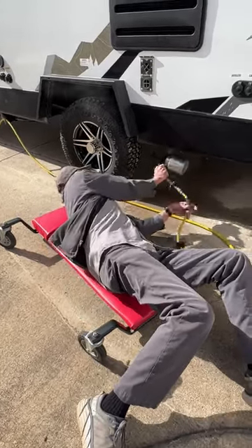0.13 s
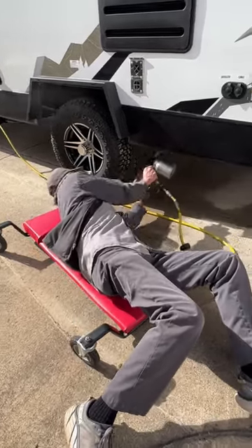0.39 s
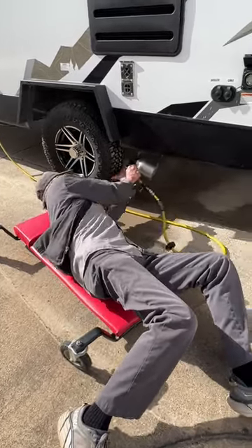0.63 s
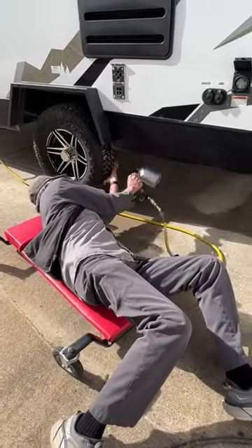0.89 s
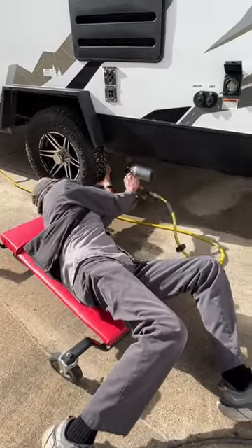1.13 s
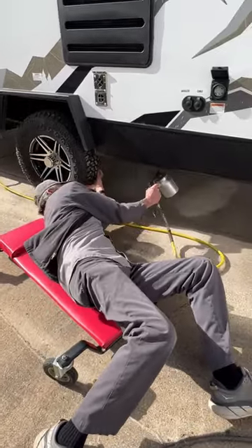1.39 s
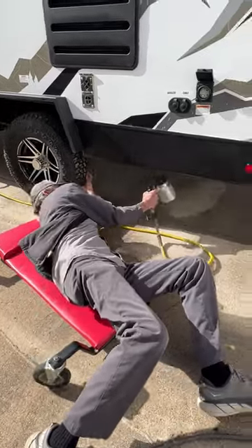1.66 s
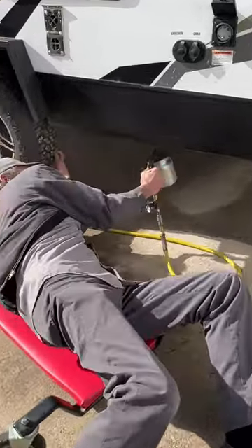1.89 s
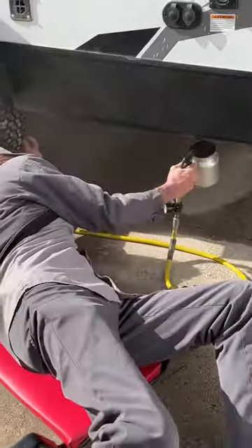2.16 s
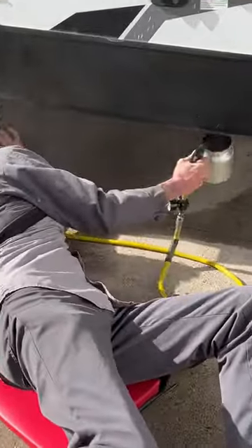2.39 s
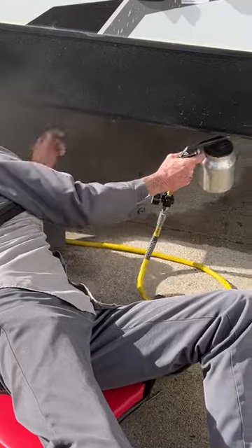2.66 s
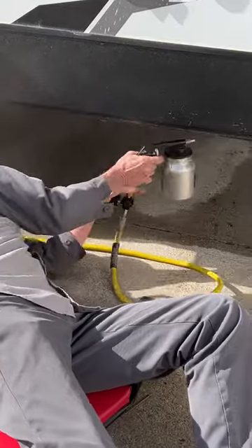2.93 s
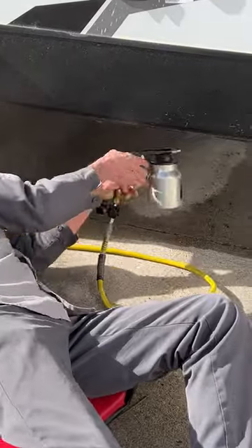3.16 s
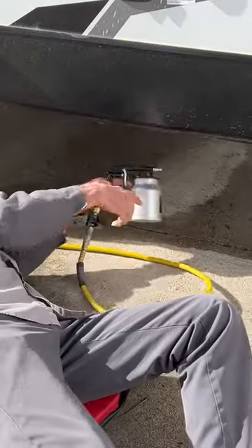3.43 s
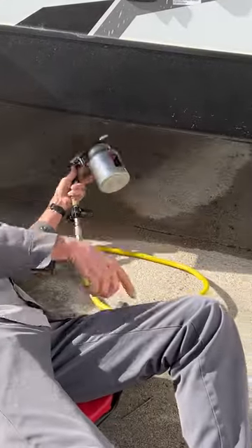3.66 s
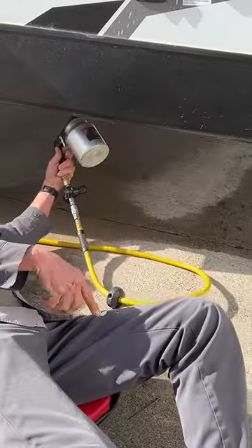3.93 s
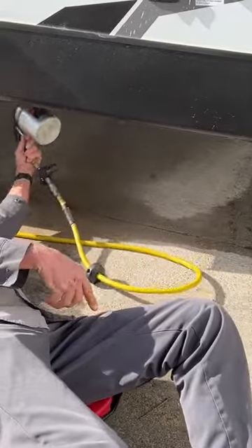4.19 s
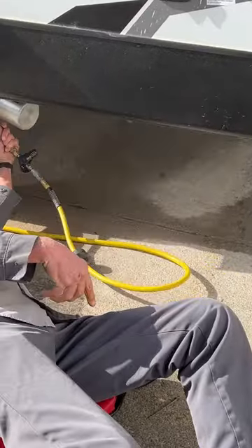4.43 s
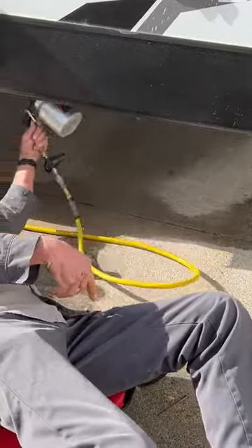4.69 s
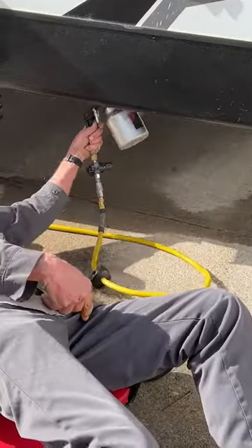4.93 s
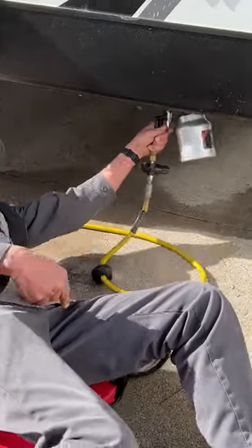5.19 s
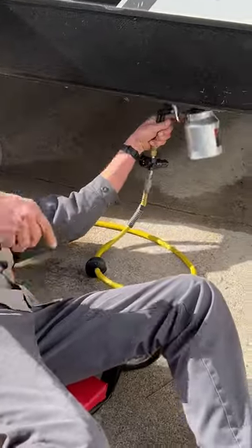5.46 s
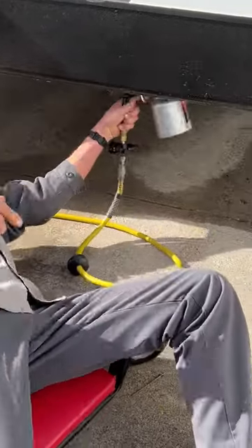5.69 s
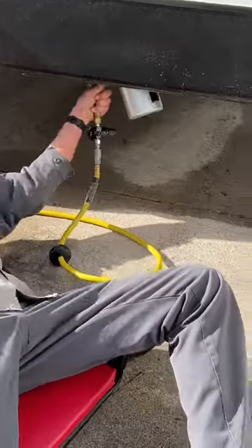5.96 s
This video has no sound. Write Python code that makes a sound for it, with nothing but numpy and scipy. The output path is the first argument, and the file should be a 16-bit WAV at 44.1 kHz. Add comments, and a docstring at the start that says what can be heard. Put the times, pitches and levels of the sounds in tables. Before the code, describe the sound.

Compressed-air spray gun hisses in three sustained bursts under a parked trailer, with buffeting wind thuds, pops and faint cloth scuffs outdoors.

```python
"""Under a trailer on concrete, a compressed-air spray gun hisses in three bursts near a hand-held phone.
The jet is shaped noise behind a valve, combed by echoes off ground and chassis, with a diffuse tail from the gap.
Wind thuds and flutters as swelling noise and pops as short falling tones; grainy noise makes cloth scuffs.
A faint whistle sounds in the second pause, over a distant outdoor hush.
When the camera zooms in, the phone narrows its wide stereo picture to a forward beam."""
import sys
import numpy as np
from scipy import signal
from scipy.fft import rfft, irfft, next_fast_len
from scipy.io import wavfile
from scipy.ndimage import uniform_filter1d, map_coordinates

SR = 44100
rng = np.random.default_rng(int(sys.argv[2]) if len(sys.argv) > 2 else 0)


def transcribe(signal):
    """Save signal, clipped to [-1, 1], as a 16-bit WAV file at the path in sys.argv[1]."""
    frames = np.atleast_2d(signal).T
    limited = np.clip(frames, -1, 1)
    pcm = np.round(limited * 32767).astype(np.int16)
    wavfile.write(sys.argv[1], SR, pcm)


def boost(x):
    """Linear amplitude factor 10**(x/20) for a level x in decibels (scalar or array-like)."""
    u = np.asarray(x, float) / 20
    return 10 ** u


N = 268128
T = np.arange(N) / SR
PADDED = next_fast_len(N + SR // 4)
HZ = np.fft.rfftfreq(PADDED, 1 / SR)
ZOOM_S = (1.81, 2.093)  # start and end of the zoom

# Trigger pulls. Each row: pressed in seconds, let go in seconds, fall after letting go in dB per second,
# level of the air draining from the nozzle in dB. The top of the hiss scales the last two by its own factor.
TRIGGER_PULLS = [(-.1, 0.773, 304, -26), (1.002, 2.612, 480.5, -33.5), (3.778, 5.429, 385, -31.5)]
# The hand swings the gun about. Each row: time in seconds, jet level in dB, lift of the top of the hiss in dB.
GUN_AIM = [(0, -17.5, 3), (.27, -20, 6), (.77, -21, 5), (1.03, -20.5, 5.5), (1.5, -22.5, 4.5),
           (1.62, -20, 4.5), (1.85, -21, 3.5), (2.3, -22, 4), (2.61, -19.5, 2), (3.8, -18, 3),
           (4.3, -18, 3), (4.35, -19.5, 4), (4.9, -22, 5.5), (5.43, -21, 5)]
# Colour of the jet. Each row: frequency in Hz, relative density in dB per Hz.
JET_COLOUR = [(300, -17), (650, -11), (1100, -8.5), (2100, -2), (3200, -1.5), (4500, -2.5), (6500, -0.5),
              (8500, 0.5), (10500, -3), (13000, -6.5), (16000, -6.5)]
# Chassis pockets the jet rings in. Each row: centre in Hz, width in Hz, lift in dB.
CHASSIS_POCKETS = [(1570, 74, 2.5), (2110, 130, 2.5), (2944, 200, 3.5), (3320, 90, 3.5), (4200, 500, 0.5),
                   (5750, 170, 1.5), (8250, 270, -0.5)]
# A deep pocket booms while the gun points into it. Each row: time in seconds, lift in dB.
BOOM_LIFT = [(.3, 2.5), (1.4, 9), (2.3, 10), (4.05, -1.5), (4.3, 10), (4.5, 15), (5.2, 3.5)]
# Echo off the concrete. Each row: time in seconds, extra path in milliseconds.
GROUND_PATH = [(0, 1.66), (.8, 2), (1.4, 1.69), (2.3, 1.61), (4, 1.465), (5.4, 1.56)]
# Echoes off parts of the chassis. Each row: central delay in milliseconds, level in dB.
CHASSIS_ECHOES = [(3.1, -11), (4.7, -10), (7.3, -13), (11.9, -10)]
# Decay under the trailer. Each row: band centre in Hz, time to fall 60 dB in seconds.
HOLLOW_DECAY = [(500, 1), (2000, 0.95), (6000, 0.69), (12000, .4)]
# Slowly changing breeze on the microphones, under the gusts.
# Each row: time in seconds, thud level in dB, flutter level in dB.
BREEZE = [(0, -31, -43), (.9, -43, -49), (1.5, -34.5, -39), (2.2, -40.5, -41), (2.95, -37, -53),
          (3.1, -68, -52.5), (3.7, -80, -56.5), (4.3, -76, -52), (4.6, -55.5, -43), (5.4, -53.5, -43),
          (5.62, -71, -50), (6.08, -86, -59)]
# Gusts. Each row: peak time in seconds, thud level in dB, flutter level in dB,
# time constant of the rise in seconds.
WIND_GUSTS = [(.13, -24, -35.5, 0.033), (.27, -25.5, -43.5, 0.018), (.34, -25, -38.5, 0.039),
              (.74, -38.5, -59.5, 0.052), (.81, -32, -40.5, 0.02), (1.22, -24.5, -32.5, 0.049),
              (1.37, -26, -37.5, 0.036), (1.5, -31, -29.5, 0.063), (1.6, -30, -30, 0.045),
              (1.68, -19, -31.5, 0.044), (1.75, -36, -33, 0.034), (1.86, -23, -46.5, 0.043),
              (2.02, -32, -26, .02), (2.1, -21.5, -42.5, 0.019), (2.36, -21.5, -44, 0.017),
              (2.55, -20, -36, 0.011), (2.59, -19, -43.5, 0.016), (2.62, -47, -30, 0.008),
              (2.66, -29.5, -44, 0.0068), (2.72, -16, -39.5, 0.024), (2.78, -20, -39, 0.022),
              (2.85, -12.5, -38.5, 0.037), (2.92, -14, -41, 0.023), (2.99, -40.5, -39, .02),
              (3.28, -42.5, -39.5, 0.047), (3.47, -63, -33.5, 0.011), (3.71, -57, -35, 0.017),
              (3.94, -34, -31, 0.037), (4.475, -61, -18, 0.053), (4.67, -29, -43.5, 0.028),
              (4.81, -42.5, -30, 0.056), (5.03, -47, -32.5, 0.079), (5.27, -44, -43, 0.046),
              (5.54, -40.5, -43, 0.017)]
# Wind pops. Each row: start in seconds, peak of the envelope in dB, nominal pitch in Hz,
# cycles to the peak (never under 0.3).
WIND_POPS = [(0.797, -24, 250, 0.98), (1.918, -18.5, 570, 1), (2.674, -15.5, 254, 0.93),
             (2.697, -14.5, 372, 1), (2.798, -21.5, 295, 0.52), (2.831, -13.5, 223, 0.45),
             (2.878, -15.5, 210.4, 0.94), (2.957, -18, 464, 1), (3.066, -27.5, 239, 0.8),
             (3.174, -33, 328, 0.98), (3.239, -22, 613, 0.84), (3.27, -21, 413, 0.61),
             (3.301, -24, 418, 0.8), (3.32, -25.5, 509, 0.94), (3.366, -22, 486, 1), (3.449, -31, 501, 0.8),
             (3.464, -18, 524, 1), (3.506, -19.5, 338, 0.45), (3.553, -32.5, 283, 1), (3.61, -23, 470, 1),
             (3.646, -36.5, 585, 1), (3.704, -19.5, 513, 1), (3.744, -19, 638, 0.95),
             (3.759, -23.5, 665, 0.75), (5.533, -14, 477, 0.7), (5.547, -24.5, 503, 0.89)]
# Cloth and hose scuffs. Each row: centre in seconds, level in dB, half length in seconds.
SCUFF_TIMES = [(3.405, -56.5, 0.018), (3.673, -60, 0.0084), (5.654, -48.5, .016), (5.684, -46, .022),
               (5.716, -57, .02), (5.773, -59.5, 0.036), (5.817, -53, .01), (5.85, -54, 0.0099),
               (5.883, -53.5, 0.021), (5.93, -55, 0.016)]
# Colour of the scuffs. Each row: frequency in Hz, relative density in dB per Hz.
SCUFF_COLOUR = [(300, -16), (700, 3.5), (1300, 0), (1800, -3), (2400, -10.5), (4500, -16.5), (9000, -21),
                (16000, -30)]
# Corners of the whistle's swell, in seconds: silent, full, starting to fade, silent again.
WHISTLE_S = (3.3, 3.46, 3.58, 3.68)
# Bands of the whistle. Each row: centre in Hz, half width in Hz, level in dB.
WHISTLE_BANDS = [(2450, 170, -74), (4620, 150, -82)]
# Colour of the outdoor hush. Each row: frequency in Hz, relative density in dB per Hz.
YARD_COLOUR = [(150, -20.5), (300, -1.5), (550, -11.5), (1500, -10), (3000, -20.5), (6000, -31),
               (9500, -32.5), (12000, -32), (16000, -41.5)]
# Sliding corner below which the bass thins out. Each row: time in seconds, octaves above 25 Hz.
BASS_CORNER = [(0, 3.42), (.7, 2.07), (1.2, 2.8), (1.6, 2.44), (1.9, 1.15), (2.2, 0.35), (2.95, 0.91),
               (3.05, 2.43), (3.7, 4.14), (4, 3.85), (4.45, 4.14), (4.7, 2.9), (5.5, 2.03), (5.65, 3.14),
               (6.08, 3.46)]
# Colour of each side port of the phone. Each row: frequency in Hz, left gain in dB, right gain in dB.
PORT_COLOUR = [(110, -1, -1.5), (250, -4, 0.5), (650, 0.5, -3.5), (1000, 1.5, -0.5), (2420, -1.5, 3),
               (3800, 2, -4), (5500, 2, -1), (6140, 3.5, -2), (7320, 1.5, 2), (7850, -5, -9),
               (7990, 2.5, 8.5), (9240, -1.5, 3.5), (9710, -6, -1)]
# Phase by which left leads right in the beam. Each row: frequency in Hz, lead in radians.
BEAM_LEADS = [(0, 0), (2500, 0), (3400, .5), (4500, .4), (5300, 0), (5860, -.6), (6500, -.05), (7250, 0),
              (8000, -.8), (8600, -1.2), (9300, -2.6), (10000, -3.14), (10700, -3.6), (12400, -5.6),
              (13400, -6.28), (14100, -6.6), (15900, -8.6), (17000, -10)]
# The same for the top of the wide picture. Each row: frequency in Hz, lead in radians.
WIDE_TOP_LEADS = [(9500, -1.8), (10400, -2.9), (11000, -3.4), (12400, -5.4), (13400, -6.28), (14100, -6.6),
                  (15900, -8.6), (17000, -10)]


def level(x, db):
    """Scale to an rms level in dB."""
    return x * boost(db) / np.sqrt(np.mean(x ** 2))


def along(hz, values):
    """Read a spectrum on a log-frequency axis."""
    return np.interp(np.log(HZ + 1), np.log(hz), values)


def colour(x, gain):
    """Filter by a gain per frequency."""
    return irfft(rfft(x, PADDED) * gain, PADDED)[..., :N]


def band(lo_hz, hi_hz, order=2):
    """Band-pass gain; a higher order makes steeper skirts."""
    low_skirt = 1 + (lo_hz / (HZ + 1)) ** (2 * order)
    high_skirt = 1 + (HZ / hi_hz) ** (2 * order)
    return 1 / np.sqrt(low_skirt * high_skirt)


def peak(hz, width_hz):
    """Resonance curve that reaches 1 at its centre and a half at the edges of its width."""
    return 1 / (1 + ((HZ - hz) / width_hz * 2) ** 2)


def walk(rate):
    """Random levels held 1 / rate seconds and slewed twice."""
    hold = int(SR / rate)
    steps = np.repeat(rng.standard_normal(N // hold + 1), hold)
    return uniform_filter1d(uniform_filter1d(steps, hold), hold)[:N]


def pair(alike):
    """Left and right noise with a given likeness 0-1, which may depend on frequency."""
    alike = np.clip(alike, 0, 1)
    mid, side = rng.standard_normal((2, N))
    return colour(mid, np.sqrt(1 + alike)) + colour(side, np.sqrt(1 - alike)) * np.array([[1], [-1]])


def echo(x, lag_s):
    """A copy read at a moving delay."""
    place = np.arange(N) - lag_s * SR
    return np.array([map_coordinates(c, place[None], order=3, prefilter=False) for c in x])


def spray():
    """Turbulent jet, coloured by the chassis pockets it rings in and combed by near reflections."""
    s, *aim_db = np.transpose(GUN_AIM)
    jet_db, top_lift_db = (np.interp(T, s, db) for db in aim_db)
    air = pair(0.29 + 0.31 / (1 + HZ / 150.0))
    air = level(colour(air, boost(along(*np.transpose(JET_COLOUR)))), 0)
    air = air * boost(0.92 * walk(60) + 1.0 * walk(400))  # slow and fast turbulence

    jet = colour(air, boost(sum(db * peak(hz, width) for hz, width, db in CHASSIS_POCKETS)))
    boom_gain = boost(np.interp(T, *np.transpose(BOOM_LIFT)))
    jet = jet + colour(jet, peak(643, 200)) * (boom_gain - 1)

    ground_lag_s = np.interp(T, *np.transpose(GROUND_PATH)) / 1000
    jet = jet + boost(-13) * echo(jet, ground_lag_s)
    # axles, springs and frame rails each send a copy whose path wanders with the hand
    jet = jet + sum(boost(db) * echo(jet, (ms + .3 * walk(2.578)) / 1000) for ms, db in CHASSIS_ECHOES)

    # the thin top of the hiss opens first and dies faster
    top = band(11000.0, 30000., order=8)
    body_part = colour(jet, 1 - top) * valve(open_s=.012, fall=1)
    top_part = colour(jet, top) * boost(top_lift_db) * valve(open_s=.003, fall=1.4)
    return (body_part + top_part) * boost(jet_db)


def valve(open_s, fall):
    """Air flow 0-1: opens quickly at each pull, dies away after it, a little drains on."""
    drain_s = .1  # time constant of the draining air at a fall of 1
    flow = 0
    for on, off, db_per_s, drain_db in TRIGGER_PULLS:
        after = np.maximum(T - off, 0)
        drain = boost(fall * drain_db) * np.exp(-fall * after / drain_s)
        shut = boost(-fall * db_per_s * after) + drain
        flow = flow + (1 - np.exp(-np.maximum(T - on, 0) / open_s)) * shut
    return flow


def hollow(x):
    """Diffuse tail of the gap between floor pan and concrete; the treble dies first."""
    t = T[:SR]
    tail = 0
    for hz, t60 in HOLLOW_DECAY:
        grain = colour(rng.standard_normal((2, N)), band(hz / 0.57, hz * 1.9))[:, :SR]
        tail = tail + grain * np.exp(-np.log(1000) * t / t60)
    tail = tail * boost(-26) / np.sqrt(np.sum(tail ** 2) / 2)  # -26 dB of energy per channel
    return signal.fftconvolve(x, tail, axes=1)[:, :N]


def wind():
    """Gusty pressure on the ports: slow thuds and a lumpy flutter."""
    gust_fall = 0.84  # a gust falls in this share of its rise time
    s, *breeze_db = np.transpose(BREEZE)
    push = np.array([boost(np.interp(T, s, db)) for db in breeze_db])
    for s, thud_db, flutter_db, rise_s in WIND_GUSTS:
        swell = np.exp(-abs(T - s) / rise_s / np.where(T < s, 1, gust_fall))
        push = push + boost(np.array([[thud_db], [flutter_db]])) * swell

    thud_colour = band(43.7, 211.0, order=3) * (HZ + 30) ** -.6
    thud = level(colour(pair(0.86), thud_colour) * boost(2.3 * walk(12)), 0)

    eddies = pair(0.81) * boost(2.5 * walk(45))
    dull, bright = (level(colour(eddies, band(160.0, top_hz, order=4) * (HZ + 100) ** -.3), 0)
                    for top_hz in (410, 770))
    # the flutter turns thinner and brighter as the wind drops
    thin = np.interp(T, (3.0, 3.28), (0, 1))
    flutter = dull * (1 - thin) + bright * thin
    return thud * push[0] + flutter * push[1]


def pops():
    """Single eddies bursting on the ports: a few cycles that drop in pitch, inside a short ragged wake."""
    rise_s, fall_s = 0.0064, .012  # time constants of the wake
    out, wake, t = np.zeros((2, N + SR)), np.zeros(N), T[:SR // 20]
    for (s, db, hz, length), chance in zip(WIND_POPS, rng.standard_normal((len(WIND_POPS), 2))):
        cycles = t * hz
        ripeness = cycles / max(length, .3)
        shape = ripeness ** 2 * np.exp(2 - 2 * ripeness)
        # the pitch sinks to 0.9 of nominal; each port has its own small random phase
        turns = 0.9 * cycles + 0.42 * (1 - np.exp(-cycles / 0.68))
        pop = shape * np.sin(2 * np.pi * turns + 0.21 * chance[:, None])
        start = int(s * SR)
        out[:, start:start + len(t)] += boost(db) * pop
        wake += boost(db) * np.exp(-abs(T - s - .004) / np.where(T < s, rise_s, fall_s))
    ragged = level(colour(pair(.85), band(170.0, 598.0, order=5)), -14.5)
    return out[:, :N] + wake * ragged


def scuffs():
    """Short grainy rubs of cloth and hose on the ground."""
    rub = colour(pair(0.34), boost(along(*np.transpose(SCUFF_COLOUR))))
    rub = level(rub * boost(2.6 * walk(160)), 0)
    return rub * sum(boost(db) * np.exp(-((T - s) / length) ** 2) for s, db, length in SCUFF_TIMES)


def whistle():
    """A faint breathy whistle in the pause: narrow noise bands under a wavering swell."""
    swell = np.interp(T, WHISTLE_S, (0, 1, 1, 0)) * boost(4.1 * walk(24.8))
    return swell * sum(level(colour(pair(0.98), peak(hz, 2 * half_width)), db)
                       for hz, half_width, db in WHISTLE_BANDS)


def yard():
    """Distant outdoor hush, slowly swelling; the wide picture hears more of it than the beam."""
    hush = colour(pair(0.45), boost(along(*np.transpose(YARD_COLOUR)))) * boost(1.7 * walk(4.6))
    wide_lift_db = np.interp(T, ZOOM_S, (9, 0))
    return level(hush, -61) * boost(wide_lift_db)


def scene():
    """Everything at the two ports."""
    gun = spray()
    return gun + hollow(gun) + wind() + pops() + scuffs() + whistle() + yard()


def low_cut(x):
    """The bass comes and goes: a steep high-pass whose corner slides, blended from half-octave steps."""
    octaves = np.clip(np.interp(T, *np.transpose(BASS_CORNER)), 0, 4.5)
    steps = np.arange(0, 4.6, .5)
    return sum(colour(x, band(25 * 2 ** k, SR, order=3)) * np.clip(1 - 2 * abs(octaves - k), 0, 1)
               for k in steps)


def twist(x, leads):
    """One signal sent left and right with a phase lead per frequency."""
    lead = np.interp(HZ, *np.transpose(leads))
    return colour(x, np.exp(.5j * lead * np.array([[1], [-1]])))


def top_cut(x):
    """Nothing passes above the cut-off."""
    return signal.sosfilt(signal.butter(12, 16950, fs=SR, output="sos"), x)


def record(dry):
    """Bass stays wide, the top is always a beam; the zoom hands the middle from the ports to the beam."""
    beam_low_hz, beam_high_hz, port_lag_s = 1204, 10330, .455 / 1000
    dry = low_cut(dry)
    centre = 1.384 * dry.mean(axis=0)
    hz, left_db, right_db = np.transpose(PORT_COLOUR)
    port_gain = boost(np.array([along(hz, left_db), along(hz, right_db)]))
    low = 1 / (1 + (HZ / beam_low_hz) ** 6)
    high = 1 / (1 + (beam_high_hz / (HZ + 1)) ** 100)

    # the right port lies further from the gun; the bass, mostly wind, shows no such lag
    port_lag = np.exp(-2j * np.pi * HZ * (1 - low) * np.array([[0], [port_lag_s]]))
    wide = colour(dry, port_gain * port_lag * (1 - high)) + colour(twist(centre, WIDE_TOP_LEADS), high)
    # a little of the two-channel sound is mixed in, so left and right differ slightly
    beam = twist(centre, BEAM_LEADS) + 0.019 * dry
    narrow = colour(dry, port_gain * low) + colour(beam, 1 - low)

    zoom = np.interp(T, ZOOM_S, (0, 1))
    heard = wide * (1 - zoom) + narrow * zoom
    finished = colour(heard, band(0.97, 15800., order=200))  # treble ends sharply at 15.8 kHz
    return top_cut(finished)


dry = scene()
out = record(dry)
transcribe(out)
```